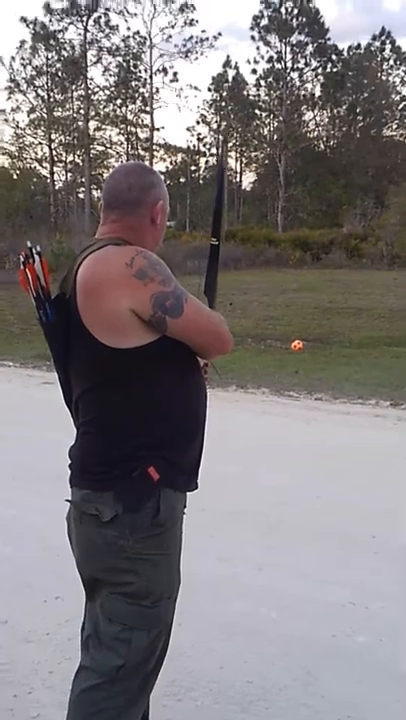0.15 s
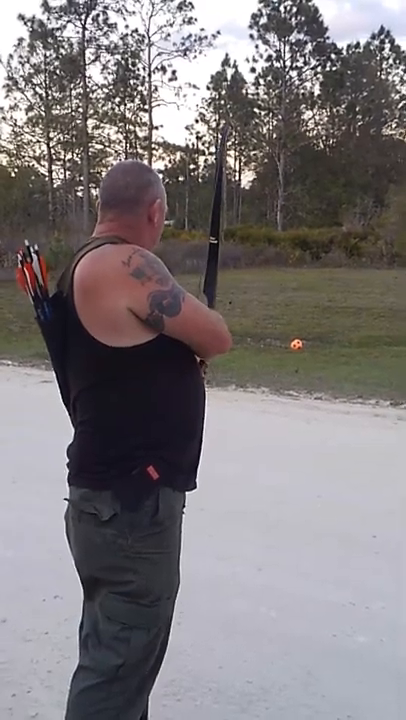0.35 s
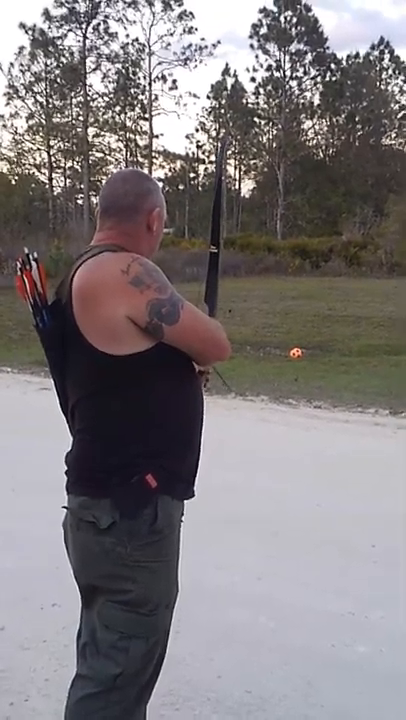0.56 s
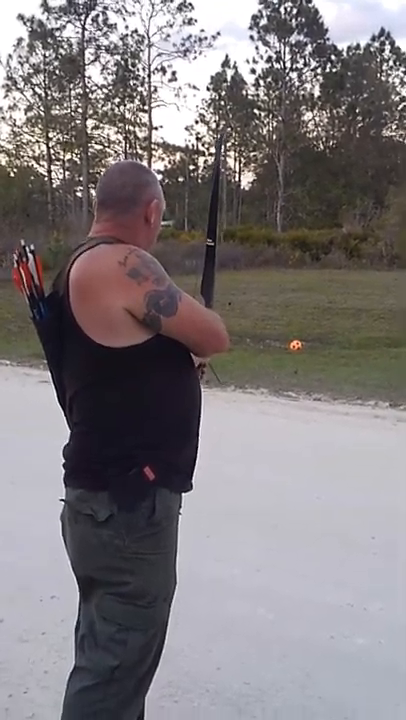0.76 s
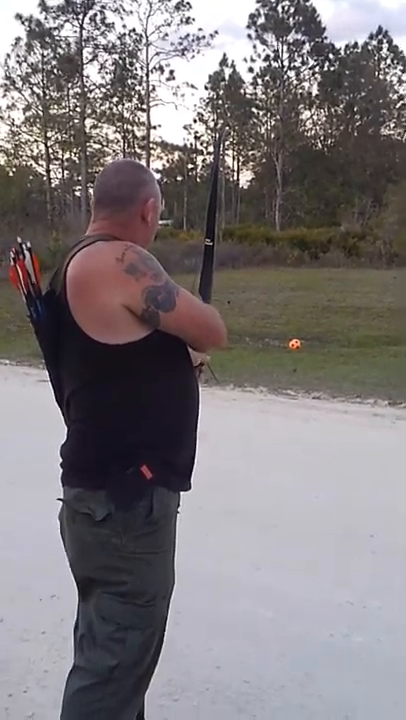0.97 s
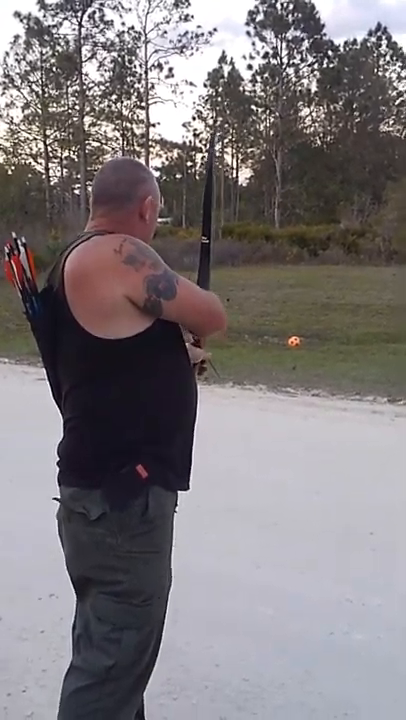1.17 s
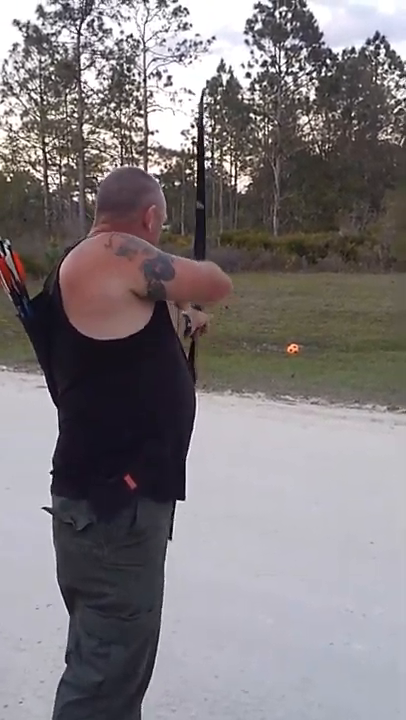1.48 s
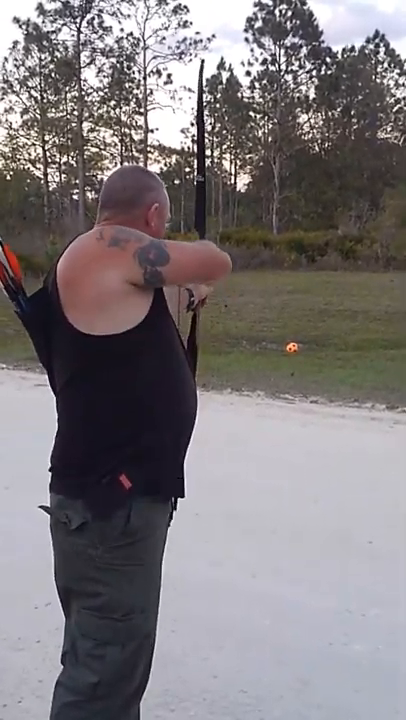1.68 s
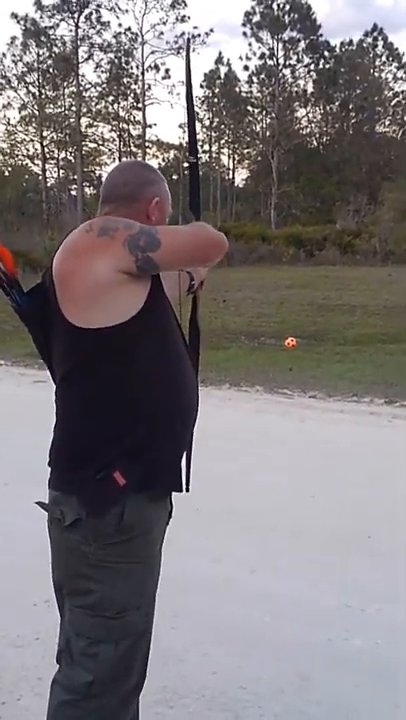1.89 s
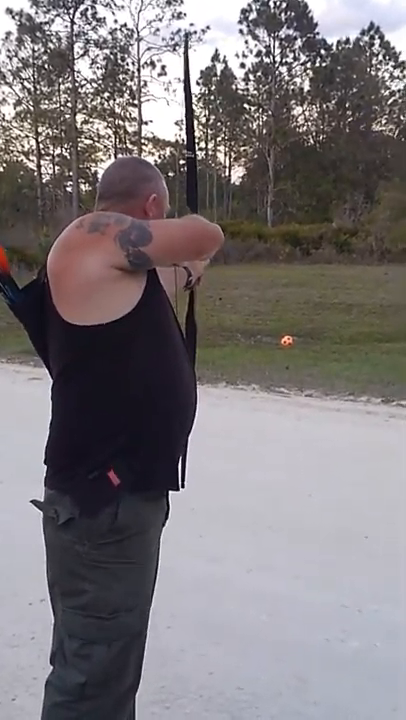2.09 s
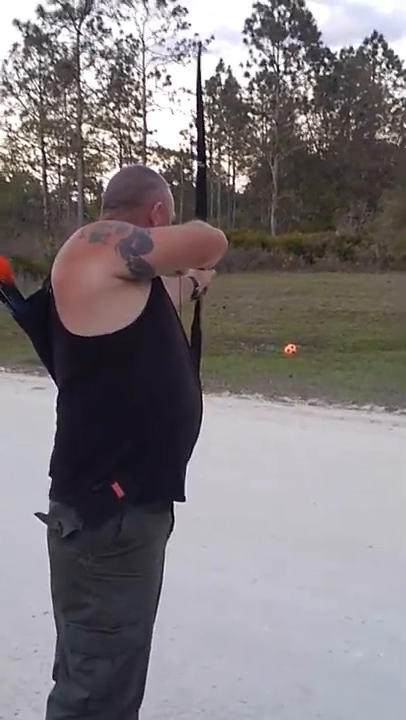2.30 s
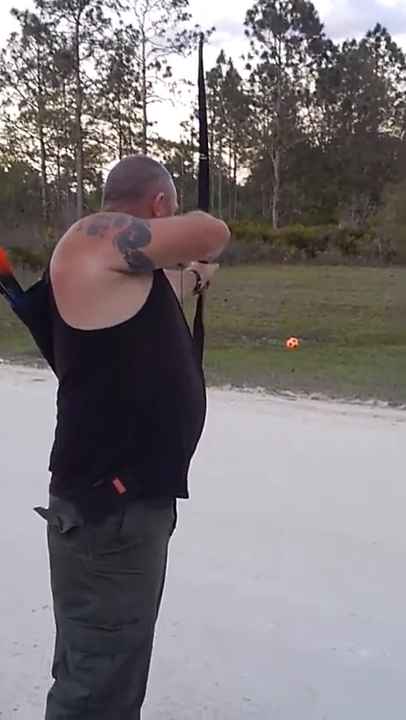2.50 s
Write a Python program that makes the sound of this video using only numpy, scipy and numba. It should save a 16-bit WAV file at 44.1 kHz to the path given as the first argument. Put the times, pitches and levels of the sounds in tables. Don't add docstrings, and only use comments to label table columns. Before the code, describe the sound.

A bow being readied and drawn, quietly, a few metres from a phone in an open field. Faint ticks at 0.1 s, a soft dull knock at 1.1 s with cloth rustle, light clicks and woody knocks from 1.9 to 2.1 s, then a faint scrape and creak, strongest near 2.4 s and falling in pitch. Throughout, surging low traffic rumble, wavering engine drone, hiss, faint high insects. No release.

```python
import sys
import numpy as np
from scipy import signal
from scipy.fft import rfft, irfft
from scipy.io import wavfile
from scipy.ndimage import uniform_filter1d
from numba import njit

SR = 44100
rng = np.random.default_rng(int(sys.argv[2]) if len(sys.argv) > 2 else 0)


def attenuation_scalar(level_db):
    decades = np.asarray(level_db, float) / 20
    return 10 ** decades


def unload_wav(signal):
    wavfile.write(
        sys.argv[1],
        SR,
        np.round(np.clip(np.atleast_2d(signal).T, -1, 1) * 32767).astype(np.int16),
    )


N = 116865


def set_rms(x, db):
    return x * attenuation_scalar(db) / np.sqrt(np.mean(x ** 2))


@njit
def svf(x, hz, width):
    y, band, low = np.empty(len(x)), 0., 0.
    for i in range(len(x)):
        g, damping = np.tan(np.pi * hz[i] / SR), width / hz[i]
        v = (band + g * (x[i] - low)) / (1 + g * (g + damping))
        band, low, y[i] = 2 * v - band, low + 2 * g * v, damping * v
    return y


def resonate(x, hz, width):
    centre = np.full(N, hz, dtype=float)
    return svf(svf(x, centre, float(width)), centre, float(width))


def walk(rate):
    hold = int(SR / rate)
    steps = np.repeat(rng.standard_normal(N // hold + 1), hold)
    return 1.3 * uniform_filter1d(uniform_filter1d(steps, hold), hold)[:N]


def column(table, t, index):
    points = np.array(table)
    return np.interp(t, points[:, 0], points[:, index])


def coloured(shape, tilt_db, swell):
    swell_db, flicker_db = 1.33, 0.5
    f = np.fft.rfftfreq(N, 1 / SR)[1:]
    hz, db = np.array(shape).T
    gain = attenuation_scalar(np.interp(np.log(f), np.log(hz), db) + tilt_db(f))
    spectrum = rfft(rng.standard_normal(N))[1:] * gain
    octaves = np.clip(np.log2(f / 31.25), 0, 9)
    out = 0
    for octave in range(10):
        share = np.clip(1 - abs(octaves - octave), 0, 1)
        band = irfft(np.r_[0, spectrum * share], N)
        out = out + band * attenuation_scalar(swell_db * swell + flicker_db * walk(5.26))
    return out


# f/Hz, density/dB
TRAFFIC = [(13, -30), (24, -27), (53, -1), (80, -3), (166, -12.5), (216, -8.5), (280, -14.5), (600, -17.5),
           (780, -67), (1320, -120)]
# f/Hz, density/dB
HISS = [(300, 2.5), (520, -4), (600, -4.5), (1100, -7), (2000, -10.5), (4000, -14), (9000, -17.5),
        (16400, -19)]


def air():
    cross_hz = 427
    swell = walk(1.0)

    def low_pass(f):
        subsonic = 10 * np.log10(1 + (30 / f) ** 6)
        return -10 * np.log10(1 + (f / cross_hz) ** 4) - subsonic

    def high_pass(f):
        return -10 * np.log10(1 + (cross_hz / f) ** 4)

    rumble = set_rms(coloured(TRAFFIC, low_pass, swell), -49)
    hiss = set_rms(coloured(HISS, high_pass, swell), -50.5)
    return rumble + hiss


# f/Hz, level/dB rms
WHINE = [(886.5, -74), (1181.5, -75)]


def whine(t):
    return sum(np.sqrt(2) * attenuation_scalar(db) * np.sin(2 * np.pi * hz * t) for hz, db in WHINE)


# t/s, level/dB
LORRIES = [(0.0, -45), (0.26, -66), (0.36, -47.5), (0.51, -55), (0.56, -57), (.66, -50.5), (0.81, -52),
           (0.92, -58), (1.2, -50.5), (1.4, -47), (1.5, -52.5), (1.68, -52), (1.8, -45), (1.95, -51.5),
           (2.36, -64), (2.48, -49), (2.55, -54.5), (2.65, -43)]
# f/Hz, width/Hz, level/dB
BOOM = [(132.7, 44, 1.5), (204, 62, -13)]


def lorries(t):
    noise = rng.standard_normal(N)
    boom = sum(attenuation_scalar(db) * set_rms(resonate(noise, hz, width), 0) for hz, width, db in BOOM)
    return boom * attenuation_scalar(column(LORRIES, t, index=1) - 5)


# t/s, level/dB
CHORUS = [
    (0, 5),
    (.5, 6.5),
    (1.05, 1),
    (1.4, 5),
    (1.9, 4),
    (2.3, 2),
    (2.65, 6),
]


def insects(t):
    band = resonate(rng.standard_normal(N), 5660, width=420)
    throb_db = 1.2 * (walk(3.6) + walk(29.9))
    return set_rms(band * attenuation_scalar(throb_db), -72.5) * attenuation_scalar(column(CHORUS, t, index=1))


# t/s, f/Hz, level/dB
DRONE = [(0, 76, -68), (.14, 76, -44.5), (.42, 76, -47), (.57, 76, -45), (.66, 76, -43), (1.03, 76, -43),
         (1.13, 76, -55), (1.28, 76, -43.5), (1.37, 76, -54.5), (1.5, 77, -43.5), (1.66, 77, -59.5),
         (1.76, 76, -40), (1.83, 76, -62), (1.96, 76, -42.5), (2.08, 76, -50.5), (2.4, 76, -43),
         (2.53, 77, -61), (2.65, 77, -44)]
# t/s, level/dB
THIRD = [(0, -60), (.2, -65), (.35, -52), (.5, -53), (.62, -59), (.85, -51), (.95, -58), (1.2, -50),
         (1.4, -55), (1.6, -50), (1.9, -54), (2.05, -58), (2.4, -59), (2.65, -58)]
# multiple of the strong order, level/dB, drift of level/dB
ENGINE_ORDERS = [
    (1, -0.5, -0.5),
    (1.5, -.6, 0.8),
    (2, -21, 5.5),
    (3.5, -19, -2),
]


def engine(t):
    wander_rad = 0.3
    phase = 2 * np.pi * np.cumsum(column(DRONE, t, index=1)) / SR
    carried = column(DRONE, t, index=2)
    usual = np.median(carried)
    bases = [carried, column(THIRD, t, index=1), usual, usual]
    out = 0
    for base_db, (multiple, db, drift_db) in zip(bases, ENGINE_ORDERS):
        gain = attenuation_scalar(db + drift_db * walk(5.56) + base_db)
        out = out + gain * np.sin(multiple * (phase + wander_rad * walk(4.09)))
    return np.sqrt(2) * out


# t/s, half length/s, f/Hz, level/dB
RUSTLES = [(.0, 0.12, 211, -60.5), (0.992, 0.06, 224, -51.5), (1.42, 0.062, 214, -52),
           (1.745, 0.039, 209, -65), (1.92, 0.058, 227, -53.5), (2.15, 0.114, 199, -55),
           (2.64, 0.042, 194, -55.5), (1.3, .12, 5660, -64.5), (1.48, .03, 6000, -63),
           (1.947, .016, 5200, -63), (1.945, .014, 6700, -65), (2.029, .012, 516, -60),
           (2.082, 0.011, 625, -52), (2.093, .012, 1180, -58), (2.303, .02, 1000, -63),
           (2.357, .03, 960, -60), (2.49, 0.016, 850, -62), (2.57, .015, 1400, -65)]


def rustles(t):
    noise = rng.standard_normal(N)
    out = 0
    for s, half, hz, db in RUSTLES:
        band = set_rms(resonate(noise, hz, width=0.32 * hz), 0)
        out = out + attenuation_scalar(db) * np.exp(-((t - s) / half) ** 2) * band
    return out


# t/s, peak level/dB, f/Hz, T60/s
TICKS = [(.12, -54, 1380, 0.072), (0.169, -56, 2700, .08), (1.108, -45.5, 447, 0.13),
         (1.91, -50, 4600, .02), (1.914, -54, 5500, .015), (1.927, -56, 5300, .015),
         (1.941, -52, 4850, 0.039), (1.944, -53, 5370, 0.021), (1.945, -47, 7700, 0.011),
         (1.955, -50.5, 1947, 0.071), (1.964, -52, 4200, .01), (2.01, -57, 510, 0.05),
         (2.05, -50, 696, 0.046), (2.074, -48, 516, .08), (2.08, -48, 770, 0.045),
         (2.087, -51, 1200, 0.049)]


def ticks(t):
    rise_cycles = 2.5
    out = 0
    for s, db, hz, t60 in TICKS:
        age = np.clip(t - s, 0, None)
        ring = np.sin(2 * np.pi * hz * age) + np.sin(2 * np.pi * 1.09 * hz * age)
        rise = 1 - np.exp(-age * hz / rise_cycles)
        out = out + attenuation_scalar(db - 60 * age / t60) * rise * ring
    return out


# t/s, tube resonance f/Hz, level/dB
SCRAPE = [
    (1.98, 1500, -85),
    (2.1, 1500, -74),
    (2.3, 1500, -72),
    (2.36, 1470, -68),
    (2.42, 1350, -65),
    (2.48, 1235, -66),
    (2.55, 1220, -70),
    (2.65, 1180, -70),
]


def scrape(t):
    grip = attenuation_scalar(2.3 * walk(60))
    grains = rng.standard_normal(N) * grip
    tube_hz = column(SCRAPE, t, index=1)
    tube = set_rms(resonate(grains, tube_hz, width=150), 0)
    squeal = attenuation_scalar(1) * grip * np.sin(2 * np.pi * np.cumsum(tube_hz) / SR)
    rest = attenuation_scalar(-13) * set_rms(resonate(grains, 2700, width=500), 0)
    shaft = (tube + squeal + rest) * attenuation_scalar(column(SCRAPE, t, index=2))
    from_s, to_s, ramp_s = 1.98, 2.5, 0.079
    bending = np.clip(np.minimum(t - from_s, to_s - t) / ramp_s, 0, 1)
    limb = attenuation_scalar(-60.5) * bending * set_rms(resonate(grains, 522, width=71), 0)
    return shaft + limb


def scene():
    t = np.arange(N) / SR
    background = air() + whine(t) + lorries(t) + insects(t) + engine(t)
    bow = rustles(t) + ticks(t) + scrape(t)
    return (background + bow)[None]


def roll_off(x):
    return signal.sosfilt(signal.butter(12, 17480, fs=SR, output="sos"), x)


def record(dry):
    top_hz = 16390
    passed = np.fft.rfftfreq(N, 1 / SR) < top_hz
    mix = irfft(rfft(dry) * passed, N)
    return roll_off(mix)


dry = scene()
out = record(dry)
unload_wav(out)
```